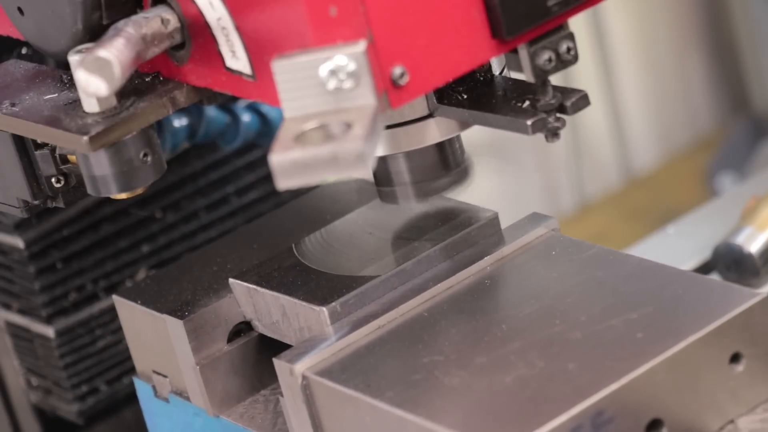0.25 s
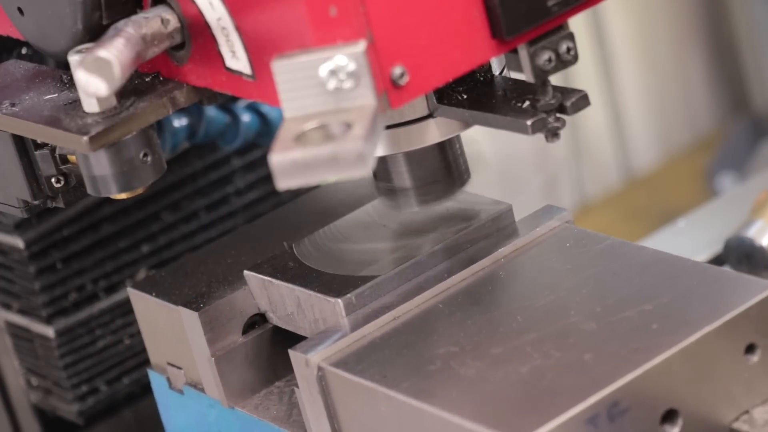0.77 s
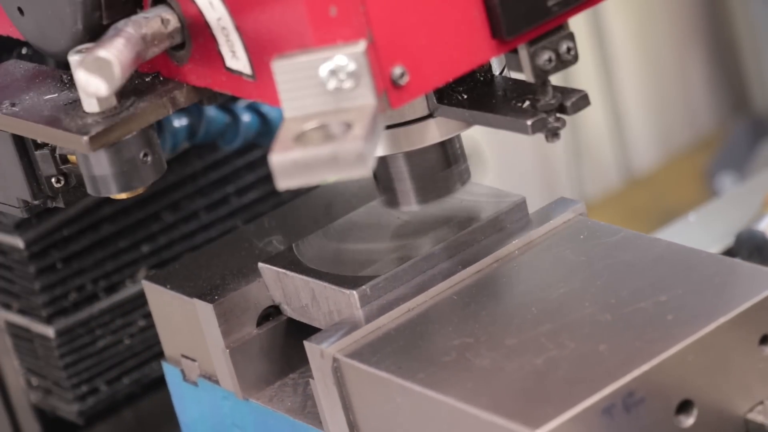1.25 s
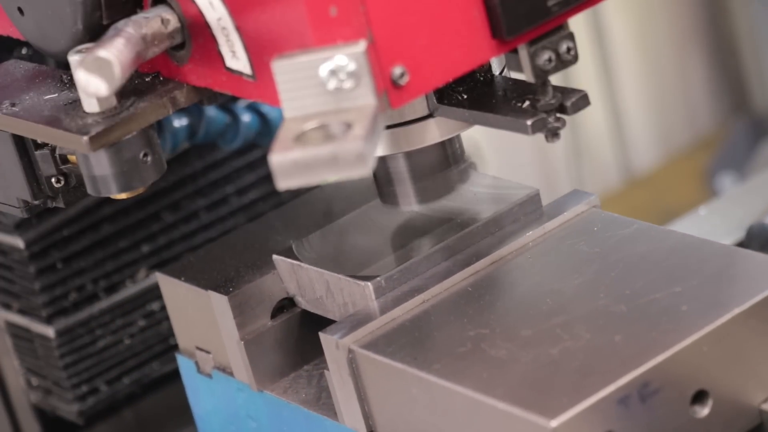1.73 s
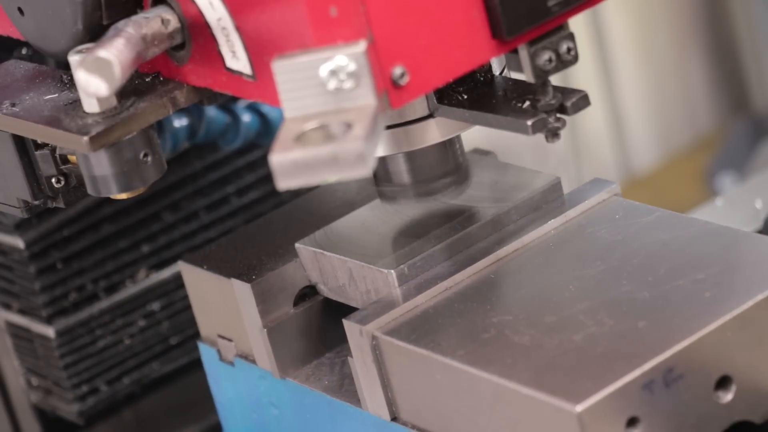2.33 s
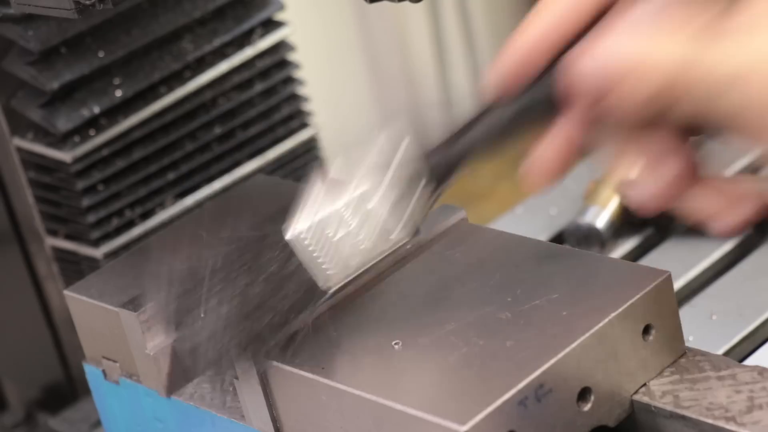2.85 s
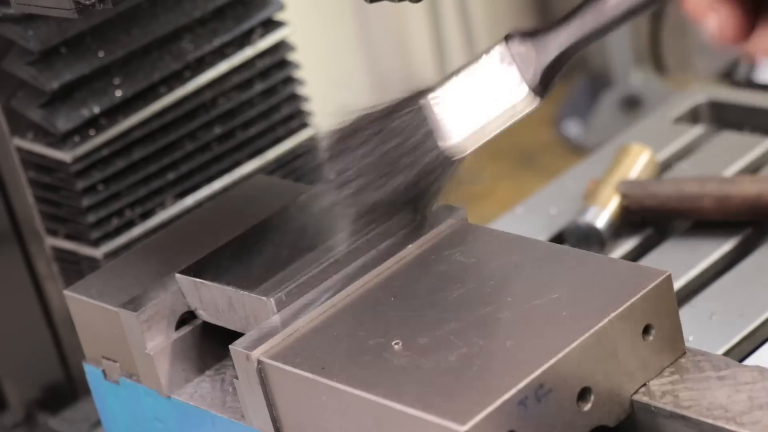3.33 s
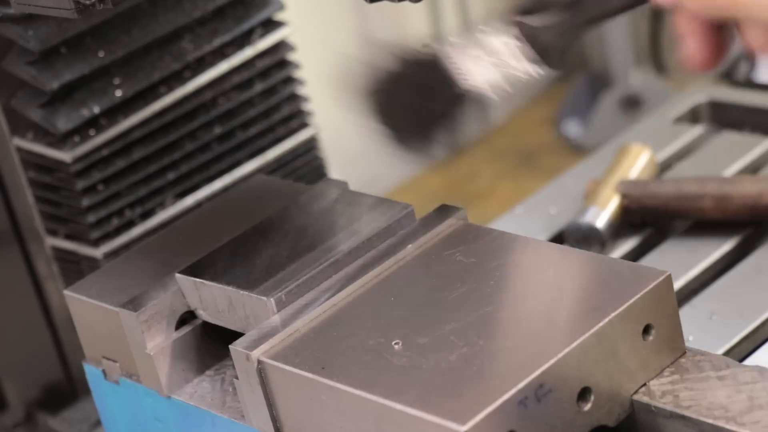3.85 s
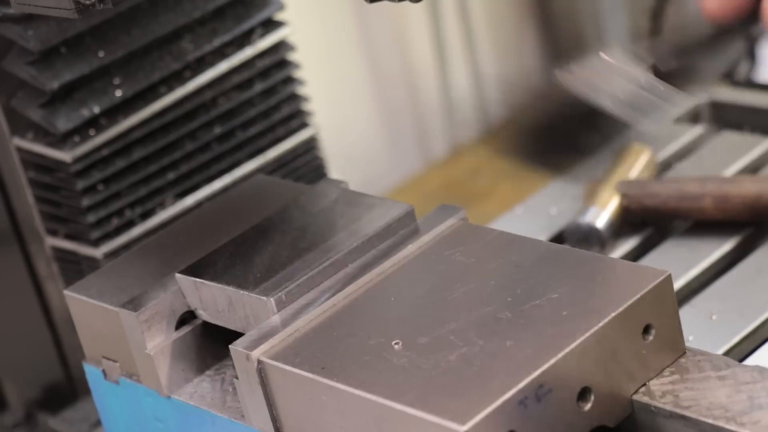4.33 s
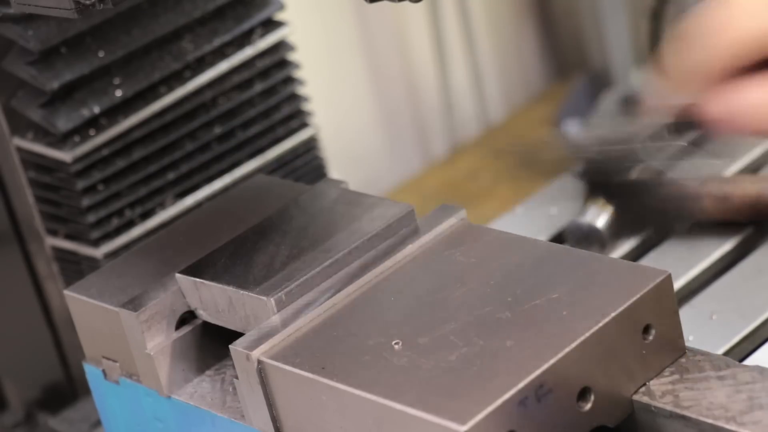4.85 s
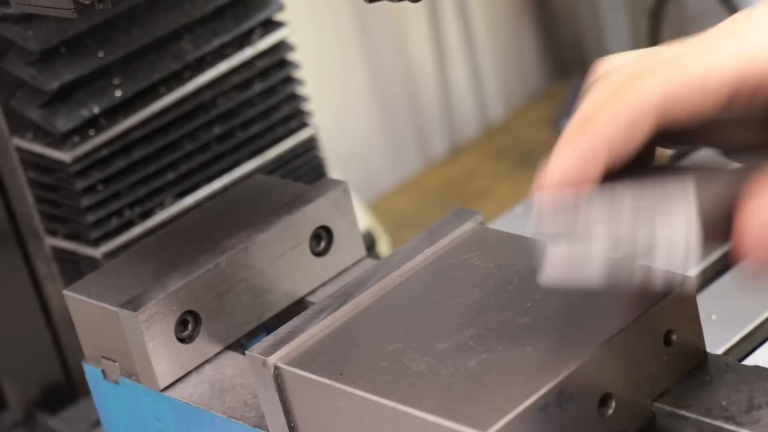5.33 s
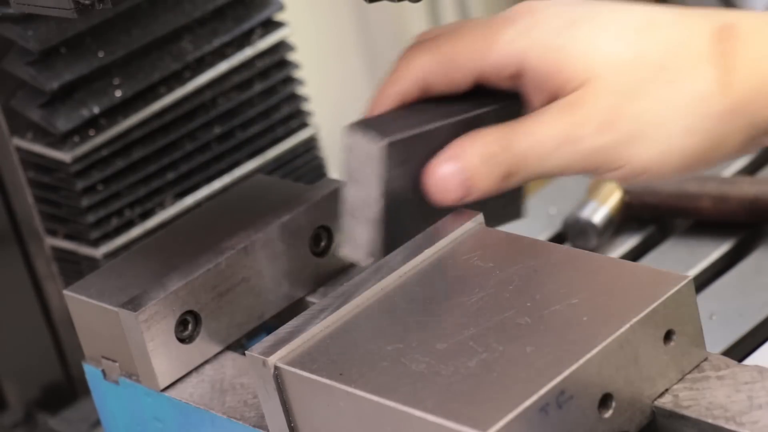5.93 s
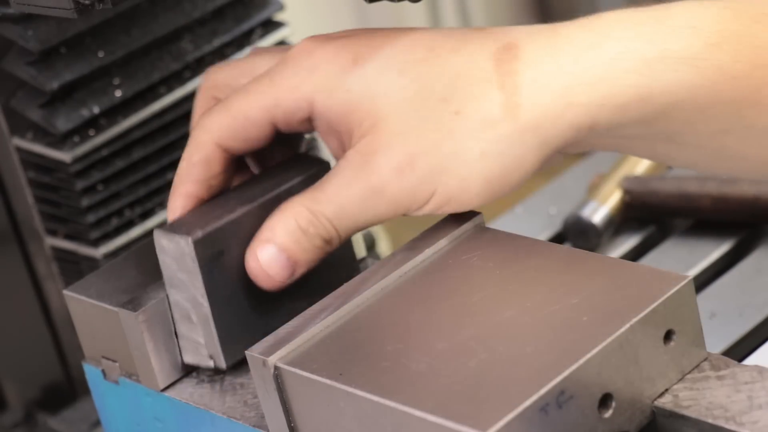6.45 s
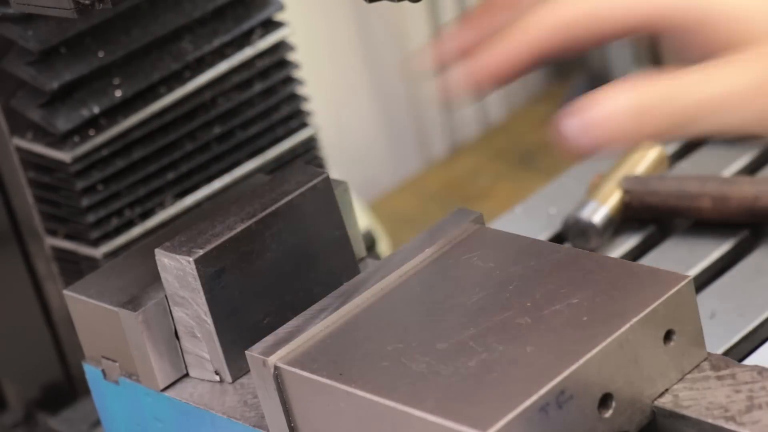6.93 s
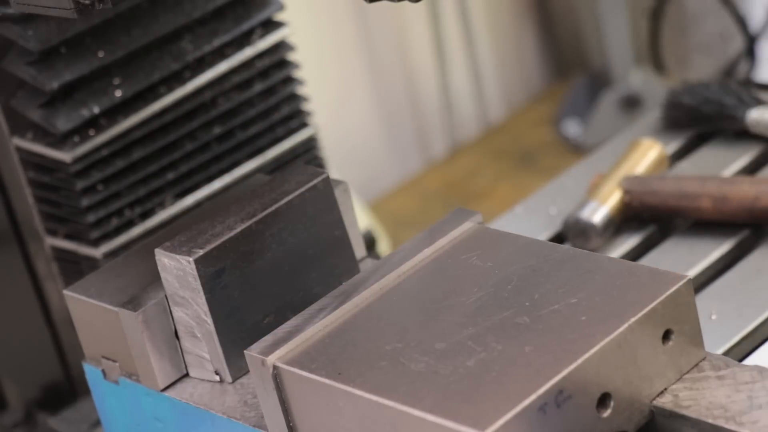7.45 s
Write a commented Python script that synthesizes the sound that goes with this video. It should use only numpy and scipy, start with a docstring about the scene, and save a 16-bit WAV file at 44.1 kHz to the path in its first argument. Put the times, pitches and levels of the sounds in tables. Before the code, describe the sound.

Close stereo in a small hard workshop: a mill cuts steel with a steady buzzing drone and pulsing hiss. The cut eases and a wavering feed-motor whine rises, then everything drops abruptly to quiet rumble. A brush swishes repeatedly over the vise with tiny metallic ticks, a steel block knocks in with sharp clacks, then slides along the jaw in jerky scrapes. The motor whine snaps back at the end.

```python
"""A small mill fly-cuts a steel block: turn-locked sines make the drone, and noise gated once a turn the hiss.
The feed motor's wavering tones rise, then the scene cuts abruptly from the running machine to a quiet workshop.
There noise swells are a brush on the vise, contact-shaped noise bursts knock the block in, and jerky noise
through its resonances slides it along the jaw; at the end the scene cuts back to the motor whine, already
running. A small hard workshop with rumble, hum and faint whine, in close stereo."""
import sys
import numpy as np
from scipy import signal
from scipy.fft import rfft, irfft, next_fast_len
from scipy.io import wavfile
from scipy.ndimage import uniform_filter1d

SR = 44100
rng = np.random.default_rng(int(sys.argv[2]) if len(sys.argv) > 2 else 0)


def waveform_to_disk(signal):
    """Save audio, clipped to [-1, 1], as 16-bit WAV at the path in sys.argv[1]."""
    frames = np.transpose(np.atleast_2d(signal))
    scaled = np.clip(frames, -1, 1) * 32767
    samples = np.round(scaled).astype(np.int16)
    wavfile.write(sys.argv[1], SR, samples)


N = 338688
T = np.arange(N) / SR

# spectrum of the low scrub of tuft or block: hz, density_db_per_hz
SCRUB = [(290, -56), (500, -16), (1140, -9.5), (1680, -8), (1890, -5.5), (2520, -2.5), (5000, -11),
         (6500, -57), (11000, -120)]
# stereo side against mid, machine sources: hz, side_minus_mid_db
SIDE_RUNNING = [(60, -29), (200, -32), (700, -6), (1300, -17.5), (2400, -9.5), (4400, -3), (15000, -2.5)]
# stereo side against mid, quiet sources: hz, side_minus_mid_db
SIDE_QUIET = [(30, -17), (110, -7), (380, -4), (1300, -2), (4400, -0.5), (15000, -1.5)]


def undb(db):
    """dB to gain."""
    return 10 ** (np.asarray(db) / 20)


def unit(x):
    """Scale to rms 1."""
    return x / np.sqrt(np.mean(x ** 2))


def colour(x, table):
    """Filter by (Hz, dB) points joined on a log-frequency axis."""
    hz, db = np.transpose(table)
    size = next_fast_len(len(x))
    f = np.arange(size // 2 + 1) * SR / size + 1
    gain = undb(np.interp(np.log(f), np.log(hz), db))
    return irfft(rfft(x, size) * gain, size)[:len(x)]


def ring(x, modes):
    """Sum of two-pole resonances (Hz, width Hz, dB)."""
    return sum(undb(db) * signal.lfilter(*signal.iirpeak(hz, hz / width, SR), x) for hz, width, db in modes)


def curves(tables, silent):
    """Columns of several tables over time; outside the tables each column holds its silent value."""
    out = np.outer(silent, np.ones(N))
    for table in tables:
        s, *columns = np.transpose(table)
        on = (T >= s[0]) & (T <= s[-1])
        out[:, on] = [np.interp(T[on], s, c) for c in columns]
    return out


def walk(rate_hz, size=N):
    """Random levels held 1 / rate_hz s and slewed; spread near 1."""
    k = int(SR / rate_hz)
    steps = np.repeat(rng.standard_normal(size // k + 1), k)
    return 0.914 * uniform_filter1d(steps, k)[:size]


def grains(scatter_db, rate_hz):
    """Noise made of tiny slips of uneven size."""
    return unit(rng.standard_normal(N) * undb(scatter_db * walk(rate_hz)))


def tones(cycles, levels_db, on, flutter_db, drift_turns, rate_hz):
    """Sines whose level and phase waver, scaled together to rms 1; silent outside on."""
    out, size = np.zeros(N), on.sum()
    for c, db in zip(cycles, levels_db):
        gain = undb(db + flutter_db * walk(rate_hz, size))
        phase_turns = c + drift_turns * walk(rate_hz, size) + rng.random()
        out[on] += gain * np.cos(2 * np.pi * phase_turns)
    return out / np.std(out[on])


def swells(table, tail_db, tail_ms):
    """Bell-shaped level of each stroke (13 dB down after rise and fall) and weak tail, main and low layer."""
    out = np.zeros((2, N))
    for s, db, rise_ms, fall_ms, low_db in table:
        i, j = int((s - .15) * SR), int((s + .3) * SR)
        t_ms = (T[i:j] - s) * 1000
        # powers, so layers and strokes add as energy
        bell = undb(-26 * (t_ms / np.where(t_ms < 0, rise_ms, fall_ms)) ** 2)
        tail_width_ms = np.where(t_ms < fall_ms, fall_ms, tail_ms)
        tail = undb(2 * tail_db - 26 * ((t_ms - fall_ms) / tail_width_ms) ** 2)
        out[:, i:j] += undb(2 * (db + np.array([[0], [low_db]]))) * (bell + tail)
    return np.sqrt(out)


def wide(source, side_table, pan_db=0., shared=.2):
    """Left and right hear different paths: side is a second play plus a quarter-cycle-shifted copy of the mid."""
    mid = source()
    copy = signal.hilbert(mid, next_fast_len(N)).imag[:N]
    side = colour(np.sqrt(shared) * copy + np.sqrt(1 - shared) * source(), side_table)
    return np.array([(mid + side) * undb(pan_db / 2), (mid - side) * undb(-pan_db / 2)])


def room(x, tail_db):
    """Add a noise tail whose decay time differs by band."""
    # room decay: hz, t60_s
    decay = [(200, 0.48), (700, 0.25), (2000, 0.33), (5000, 0.16), (12000, 0.19)]
    t = T[:SR // 2]
    tail = np.zeros(len(t))
    for hz, t60_s in decay:
        band = signal.lfilter(*signal.iirpeak(hz, .8, SR), rng.standard_normal(len(t)))
        tail += band * undb(-60 * t / t60_s)
    tail *= np.clip(t / 0.0042, 0, 1)
    return x + undb(tail_db) * signal.fftconvolve(x, tail / np.linalg.norm(tail))[:N]


def machine():
    """Turn-locked drone, and hiss that bursts at each bite and rings the frame."""
    # levels while running, before the trims in play: start_s, drone_db, hiss_db, low_hiss_above_hiss_db
    running = [
        [(0, -40, -30.5, -1), (.15, -38.5, -30, -1.5), (1.75, -39, -29, -1), (1.9, -40, -29.5, 3),
         (2.22, -46, -34, 0), (2.33, -48, -31, -2), (2.38, -54, -36, -9), (2.558, -49, -34, -5)],
        [(7.598, -58, -35, -5), (7.68, -58, -35, -5)],
    ]
    # spindle speeds up and hunts as the tool leaves the work: start_s, turns_per_s, hunting_turns
    spindle = [(0, 50.335, .0016), (1.75, 50.325, .0016), (1.88, 50.325, .012), (2.1, 51.0, .014)]
    # resonances colouring the spindle multiples: hz, width_hz, gain_db
    drone_modes = [(282.6, 49, -12.5), (484, 184, -16.5), (709, 57.4, 3), (924, 40, -6), (1142, 240, -6.5),
                   (1256, 30, -1.5), (1362, 40, -12.5), (1462, 64, 0), (1544, 80, -1.5), (1753, 65, -7),
                   (1985, 143, -2), (2116, 125, .5), (2299, 82, 4), (2550, 260, -25)]
    # cutting hiss spectrum: hz, density_db_per_hz
    hiss_spectrum = [(88, -58), (150, -31), (291, -40), (601, -27), (702, -5.5), (821, -30), (960, -26),
                     (1240, -10), (2310, -3.5), (2810, -4), (3300, 0), (4580, 0), (5460, -5), (8730, -2),
                     (16000, -11.5)]
    # frame resonances rung by the hiss: hz, width_hz, gain_db
    frame_modes = [(1260, 40, -5), (1460, 60, -6), (2310, 76, -4), (3300, 150, -6), (4586, 16, 8),
                   (4620, 260, -2), (5180, 60, -5), (6060, 150, -8), (6550, 50, -5), (6850, 170, -2),
                   (7690, 110, -6), (7950, 56, -5), (8660, 190, -4), (9600, 120, -3), (11100, 160, -4),
                   (12100, 90, -7), (15500, 300, -9)]
    first_bite_s = .0015
    multiples = range(5, 60)
    edge_multiple, edge_db, edge_from_s, edge_to_s = 17, 20, 1.85, 2

    drone_db, hiss_db, low_db = curves(running, [-120, -120, 0])
    on = drone_db > -100
    s, turns_per_s, hunting_turns = np.transpose(spindle)
    turns = np.cumsum(np.interp(T, s, turns_per_s)) / SR - first_bite_s * turns_per_s[0]
    hunting = np.interp(T, s, hunting_turns)
    wobble = hunting * walk(25.22)  # the belt lets the spindle lead and lag, which blurs the high multiples

    # share of the hiss that comes in bites: full cut, then falling to running free
    bite_share = np.where(T < 2.12, 0.43, np.interp(T, [2.12, 2.18], [0.366, 0.074]))
    bite_scatter = rng.standard_normal(N // 500)[np.floor(turns).astype(int) + 1]
    force = undb((0.5 + 110 * hunting) * bite_scatter)  # most uneven while hunting
    phase = turns % 1
    burst = force * np.clip(phase / 0.052, 0, 1) * np.exp(-(phase / 0.25) ** 2.57)
    gate = 1 - bite_share + 2.07 * bite_share * burst
    low_split = [(10, 0), (1500, 0), (6000, -20), (20000, -20)]
    high_split = [(10, -20), (1500, -20), (6000, 0), (20000, 0)]

    hz, width_hz, gain_db = np.transpose(drone_modes)
    levels_db = []
    for k in multiples:
        detuning = 2 * (k * turns_per_s[0] - hz) / width_hz
        levels_db.append(10 * np.log10(np.sum((undb(gain_db) / (1 + detuning ** 2)) ** 2)))
    # one multiple sings out while the tool crosses the edge of the block
    edge = (T[on] > edge_from_s) & (T[on] < edge_to_s)
    levels_db[multiples.index(edge_multiple)] += edge_db * uniform_filter1d(1. * edge, SR // 50)

    def play():
        cycles = [k * (turns + wobble)[on] for k in multiples]
        drone = tones(cycles, levels_db, on, 2.2, 8 * hunting[on], 29.79)
        noise = grains(1.16, 1500)
        low = colour(noise * gate ** 0.17 * undb(low_db), low_split)  # the bass rings on between bites
        gated = low + colour(noise * gate, high_split)
        hiss = unit(colour(gated, hiss_spectrum)) + undb(-3.07) * unit(ring(gated, frame_modes))
        return undb(drone_db + 7.5) * drone + undb(hiss_db + 4.5) * hiss
    return wide(play, SIDE_RUNNING, -1.0)


def shop():
    """Workshop rumble and air hiss, gently uneven, with a low wandering hum and a faint whine."""
    # rumble and air spectrum: hz, density_db_per_hz
    air_spectrum = [(14, -21), (27, 5.5), (38, -12), (60, -6.5), (204, -13), (499, -16), (628, -19.5),
                    (1100, -20.5), (2060, -25), (2910, -23), (3500, -22), (4200, -24.5), (4800, -34),
                    (7120, -28), (16000, -36)]
    # floor level, far lower under the cut: start_s, level_db
    floor = [(0, -69), (2.1, -83), (2.45, -56), (2.557, -50), (2.559, -53), (7.59, -54.5), (7.61, -54)]
    # hum level before trim and waver: start_s, level_db
    hum_levels = [(2.56, -59), (2.68, -51.5), (2.78, -65.5), (4.06, -54.5), (4.29, -63), (6.79, -63),
                  (7.6, -67)]
    # high whine that sags and comes and goes, before waver: start_s, pitch_hz, peak_db
    whistle = [(2.9, 3745, -80), (3.1, 3740, -69), (3.75, 3735, -70), (4.1, 3725, -84), (5.3, 3700, -84),
               (5.6, 3690, -72), (6.4, 3410, -72), (7.0, 3340, -66), (7.59, 3290, -67)]

    hum_db = curves([hum_levels], [-76])[0]
    hum_hz = 83 + 6.27 * walk(2.7)
    hum_gain = np.sqrt(2) * undb(hum_db - 1.5 + 3.3 * walk(6.5))
    hum = hum_gain * np.cos(2 * np.pi * np.cumsum(hum_hz) / SR)

    whine_hz, whine_db = curves([whistle], [3500, -120])
    whine_turns = np.cumsum(whine_hz) / SR + 0.046 * walk(40)
    whine = undb(whine_db + 3.0 * walk(6.2)) * np.cos(2 * np.pi * whine_turns)

    floor_db = np.interp(T, *np.transpose(floor)) + 0.4 * walk(1.97)

    def play():
        return undb(floor_db) * unit(colour(rng.standard_normal(N), air_spectrum))
    return wide(play, SIDE_QUIET) + hum + whine


def feed():
    """The feed motor's wavering tones, each with a rough skirt where it shakes the slides."""
    # motor level, in the first scene and after the cut back at the end: start_s, level_db
    effort = [
        [(2.1, -41.5), (2.3, -31.5), (2.42, -26.5), (2.558, -21)],
        [(7.598, -20), (7.68, -21)],
    ]
    # motor tones of the same two passages: pitch_hz, relative_level_db
    whine = [(2309, -22.5), (2412, -44), (3058, -35), (4086, -32), (4613, -32.5), (4657, -33), (4721, -34),
             (5098, -33.5), (5975, -32.5), (6460, -33), (6896, -41), (6944, -25), (7822, -44), (8075, -51),
             (8280, -34), (8742, -47), (10815, -32)], [(2304, -29.5), (3058, -41), (4081, -34.5),
             (4694, -37), (5098, -36.5), (6013, -38), (6428, -37), (6923, -31.5), (7375, -37),
             (7860, -33.5), (10831, -34), (11967, -43), (12225, -47), (12925, -52)]
    effort_db = curves(effort, [-120])[0]

    def play():
        out = np.zeros(N)
        for passage, lines in zip(effort, whine):
            on = (T >= passage[0][0]) & (T <= passage[-1][0])
            out += tones([hz * T[on] for hz, _ in lines], np.array(lines)[:, 1], on, 1.84, 0.04, 65.8)
            noise = rng.standard_normal(on.sum())
            # two passes steepen each resonance
            skirts = sum(ring(ring(noise, [(hz, 240., 0)]), [(hz, 240., db)]) for hz, db in lines)
            out[on] += undb(-6) * unit(skirts)
            table_drag = [(1620, 1140.0, 0)]  # the machine table's dull drag
            out[on] += undb(-13.5) * unit(ring(ring(noise, table_drag), table_drag))
        return undb(effort_db) * out
    return wide(play, SIDE_RUNNING, -0.59)


def brush():
    """Bristle tips flick off the steel (hiss) while the tuft drags (scrub); the ferrule ticks on edges."""
    # strokes: peak_s, hiss_db, half_length_ms, scrub_above_hiss_db, touch_down_lead_ms, touch_down_db
    strokes = [(2.679, -40, 35, -7.5, 28, -42.5), (3.006, -44, 42, -1, 49, -47.5),
               (3.313, -41, 28.6, 1, 64, -48.5), (3.571, -41.5, 28, -7.5, 33, -42.5),
               (3.804, -42, 33, -5.5, 23, -45), (4.074, -33, 21.3, -6, 28, -42.5),
               (4.332, -44, 40, -4.5, 40, -55), (4.582, -37, 13, -9, 7, -41),
               (4.885, -35.5, 34.4, -5, 26, -43), (5.16, -47.5, 23, -7, 26, -55),
               (5.59, -51, 33, -6, 20, -44.5), (5.704, -62, 32, -4, 10, -70), (5.845, -62, 44, -9, 10, -70)]
    # bristle hiss spectrum: hz, density_db_per_hz
    bristle_spectrum = [(2350, -21), (4000, -5.5), (4710, -12), (5350, -4), (8260, -0.5), (12700, -7.5),
                        (16000, -17)]
    # ferrule ticks: start_s, level_db
    ticks = [(2.955, -52), (3.3059, -43), (3.3144, -52), (3.7964, -40), (4.0233, -32), (4.064, -31),
             (4.8768, -33.5), (5.562, -31)]
    settle_db, settle_ms = -15, 64  # bristles spring back after each sweep
    touch_ms, touch_scrub_db = 12, 4  # the tuft lands with a flick, a little lower in colour

    sweep_rows, touch_rows = [], []
    for s, db, half_ms, scrub_db, lead_ms, touch_db in strokes:
        sweep_rows.append((s, db, half_ms, half_ms, scrub_db))
        touch_rows.append((s - lead_ms / 1000, touch_db, touch_ms, touch_ms, scrub_db + touch_scrub_db))
    sweeps = swells(sweep_rows, settle_db, settle_ms)
    touches = swells(touch_rows, settle_db, touch_ms)
    hiss, scrub = np.hypot(sweeps, touches)

    def play():
        tips = unit(colour(grains(1.9, 2000), bristle_spectrum))
        tuft = unit(colour(grains(3.4, 900), SCRUB))
        out = hiss * tips + scrub * tuft
        tick_decay = undb(-60 * T[:300] / 0.0044)
        for s, db in ticks:
            i = int(s * SR)
            out[i:i + 300] += undb(db) * tips[i:i + 300] * tick_decay
        return room(out, -12.5)
    return wide(play, SIDE_QUIET, -2.5)


def knocks():
    """Bright crack, then a rattle in the vise's resonances; a longer contact is duller."""
    # knocks on the vise; the last row is the click of the scene cut:
    # start_s, early_level_db, contact_ms, rattle_t60_s, crack_above_rattle_db
    hits = [(3.246, -55, 0.97, 0.025, -8), (5.356, -49.5, 0.66, 0.15, -12), (6.413, -43, 0.18, 0.094, -13),
            (6.456, -46, 0.16, 0.095, -13), (6.472, -28.5, 0.019, 0.037, 26),
            (6.485, -40.5, 0.25, 0.79, -13), (6.5875, -19.5, 0.047, 0.32, 16), (7.303, -48, 0.62, 0.37, -9),
            (7.523, -49.5, 0.85, .13, -4), (7.596, -48, 0.2, 0.035, 9)]
    # knock spectrum: hz, density_db_per_hz
    clack_spectrum = [(90, -46), (150, -21), (380, -14), (550, -6.5), (870, -7), (1420, -2.5), (2360, -4),
                      (3400, -1.5), (7300, -11), (12200, -32), (16000, -50)]
    # vise resonances: hz, width_hz, gain_db
    vise_modes = [(430, 120, -1), (560, 150, -1), (740, 120, -2), (960, 80, -5), (1140, 80, -5),
                  (1380, 160, 0), (1950, 200, -1), (2860, 200, 2), (3400, 300, -1), (4050, 450, -4),
                  (5200, 900, -11)]
    # stereo side against mid: hz, side_minus_mid_db
    side_table = [(60, -11), (110, -9), (200, -15), (380, -15), (700, -7), (1290, -4), (2380, -1.5),
                  (4400, -1), (8120, 1), (15000, -1)]

    def play():
        out, t = np.zeros(N), T[:SR // 2] - .01
        for s, db, contact_ms, t60_s, crack_db in hits:
            noise = rng.standard_normal(len(t)) * (t >= 0)
            rattle = noise * undb(-60 * t / t60_s)
            crack = noise * undb(crack_db - 60 * t / 0.029)
            # the rattle is duller than the crack
            source = crack + signal.lfilter(*signal.butter(1, 4000, fs=SR), rattle)
            body = colour(source, clack_spectrum) + undb(-5) * ring(source, vise_modes)
            push = np.exp(-(T[:200] * 1000 / contact_ms))
            hit = np.convolve(body, push)[:len(t)]
            hit *= undb(db) / np.std(hit[t < .03])
            i = int((s + t[0]) * SR)
            out[i:i + len(t)] += hit[:N - i]
        return room(out, -2.9)
    return wide(play, side_table, -1.1)


def slide():
    """Stick-slip of steel on steel rings the block; the jaw answers lower."""
    # jerks along the jaw: peak_s, level_db, rise_ms, fall_ms, scrub_above_level_db
    jerks = [(6.721, -32, 18, 36, -11.5), (7.054, -31, 5.8, 16, -41), (7.077, -29, 17, 15, -26),
             (7.1, -28, 7.4, 5.1, -24), (7.12, -31, 16, 11, -20), (7.19, -39.5, 19, 13, -9),
             (7.261, -50.5, 22, 31, -2), (7.318, -39, 29, 27, -10), (7.547, -27.5, 5.7, 14, -9)]
    # rubbing spectrum: hz, density_db_per_hz
    rub_spectrum = [(1150, -63), (1380, -24), (2050, -32), (2500, 3), (5190, 2), (5970, 1), (6650, 4),
                    (11400, -2.5), (13600, -13), (15400, -44), (16000, -89)]
    # block resonances: hz, width_hz, gain_db
    block_modes = [(1380, 40, 17), (3380, 90, -8), (4000, 150, -9), (4800, 100, -6), (5780, 110, 2),
                   (6020, 110, 4), (6230, 60, -1), (7150, 190, 0), (7400, 50, -2), (7750, 100, -6),
                   (8700, 150, -3), (11300, 250, -2), (13100, 100, -1)]
    level, scrub = swells(jerks, -16.5, 112)  # each jerk trails off in a weak creep (dB, ms)

    def play():
        slips = grains(2.0, 1000)
        steady_rub = colour(slips, rub_spectrum)
        rub = colour(level * slips, rub_spectrum) / np.std(steady_rub)
        rung = ring(rub, block_modes) / np.std(ring(unit(steady_rub), block_modes))
        jaw = scrub * unit(colour(slips, SCRUB))
        return room(undb(-9) * rub + undb(-3.0) * rung + jaw, -10.5)
    return wide(play, SIDE_QUIET, -4.5)


def scene():
    """All sources together."""
    return machine() + shop() + feed() + brush() + knocks() + slide()


def record(dry):
    """The recorder rounds the loudest peaks and cuts the top."""
    top_hz = 15760
    lowpass = signal.ellip(12, .3, 80, top_hz, fs=SR, output="sos")
    return signal.sosfilt(lowpass, np.tanh(dry))


dry = scene()
out = record(dry)
waveform_to_disk(out)
```